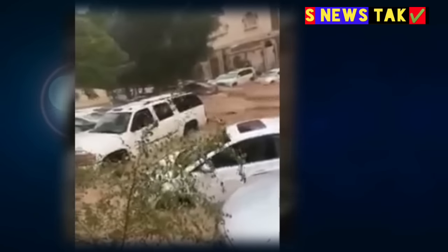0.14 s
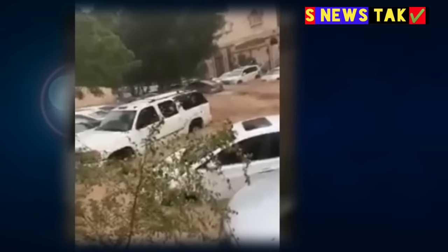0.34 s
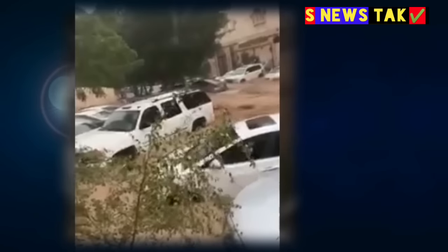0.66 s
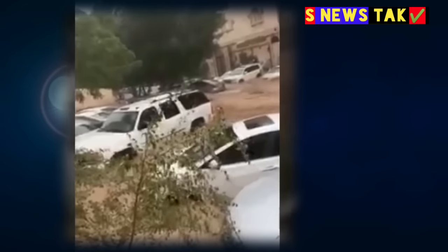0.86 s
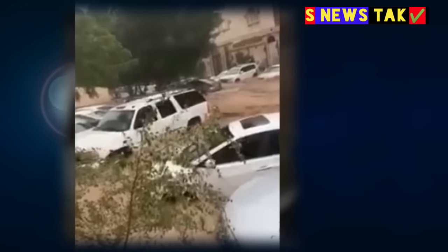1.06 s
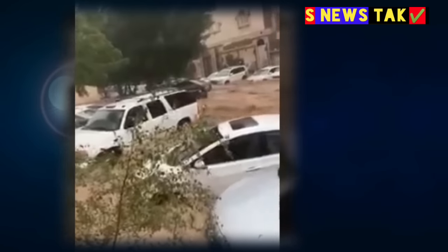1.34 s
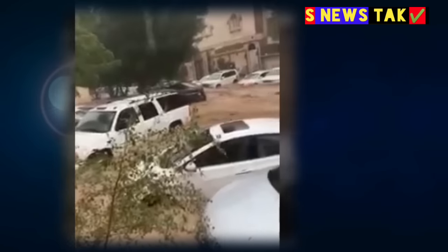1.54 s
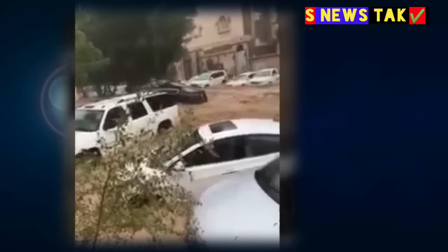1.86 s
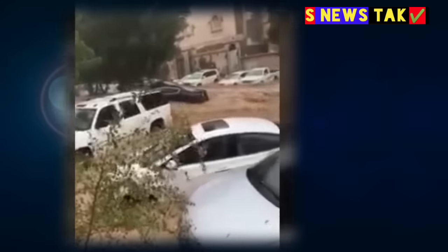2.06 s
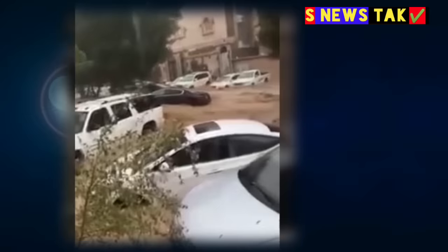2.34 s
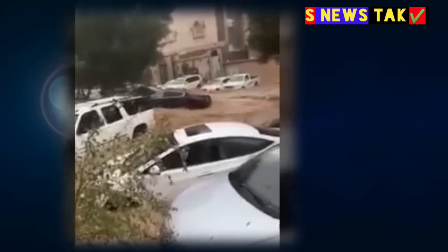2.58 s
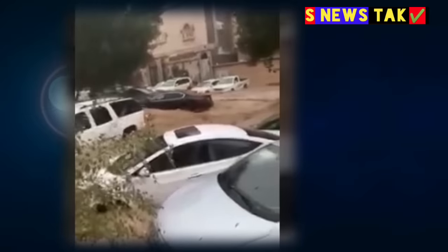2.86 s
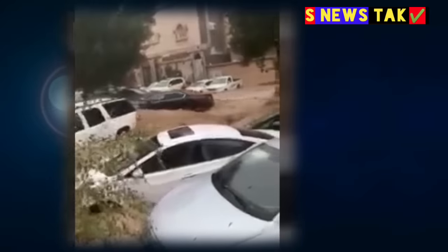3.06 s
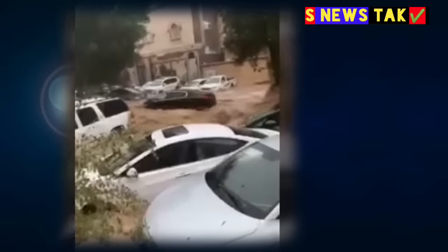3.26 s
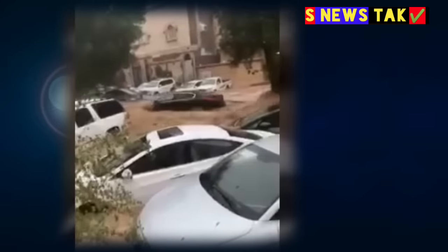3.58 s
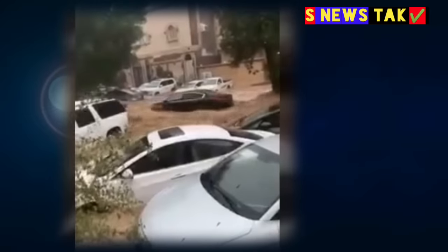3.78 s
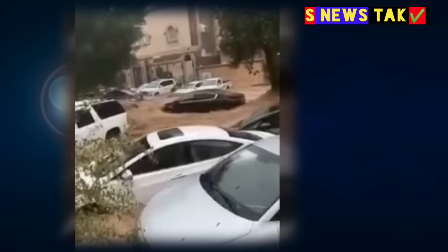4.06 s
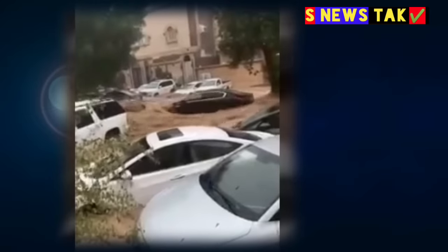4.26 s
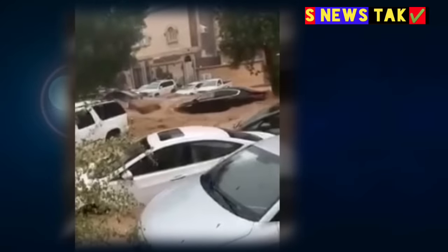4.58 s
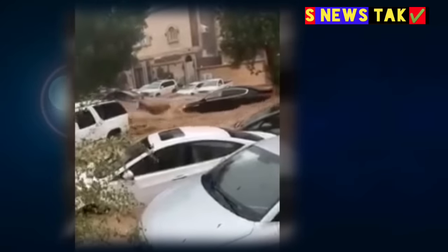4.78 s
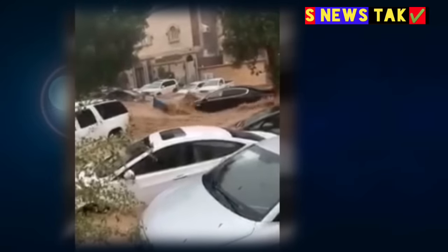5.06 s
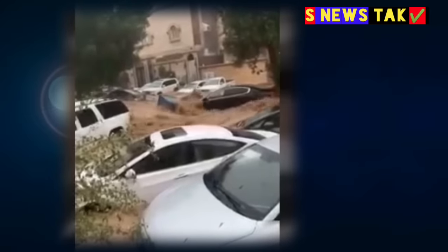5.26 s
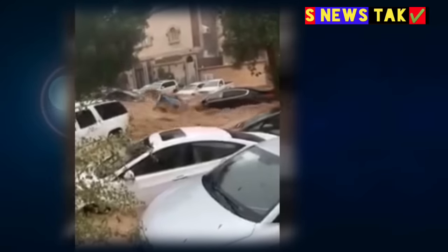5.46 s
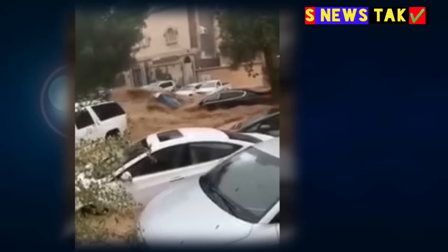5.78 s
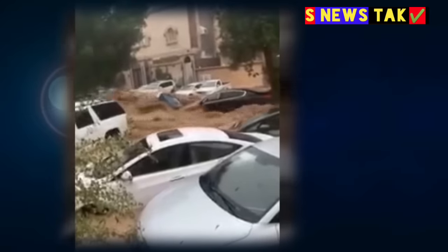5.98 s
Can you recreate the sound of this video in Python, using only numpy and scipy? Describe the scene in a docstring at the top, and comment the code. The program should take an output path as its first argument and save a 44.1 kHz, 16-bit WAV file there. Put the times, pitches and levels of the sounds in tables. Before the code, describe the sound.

Loud muddy floodwater runs throughout, an even dark roar centred in the low mids, thick with small gurgling bubbles, over a surging bass rumble and a very faint hiss of spray. The bass rises quickly at the start, eases around 0.7 s, and is fuller again from about 4 s until it drops at the end. At 0.2 s a firm knock on sheet metal ticks, then slides down into a low boom; softer bumps follow at 0.6 and 1.0 s. Around 1.9 s comes a tight cluster of higher, hollow clunks, then a low knock at 2.6 s. An unsteady deep hum wavers from 1.9 to 3.2 s, again at 4.1-4.6 and 5.3-5.7 s. At 5.0 s the hardest bang lands, with a short metallic crumple and boom, then light thuds at 5.2, 5.5 and 5.7 s. The sound is sheltered, slightly boxy, with dulled treble.

```python
"""Muddy floodwater races down a street past parked cars, heard from a sheltered spot.
Shaped noise makes the torrent: a surging bass, an even roar with gurgling bubbles, and a hiss of spray.
Drifting cars and debris knock on sheet metal as ticks, gliding thuds and slow booms,
once with a crunch of noise ringing the sheet's modes. A low hum of wavering sines comes and goes.
A hollow colours all but the knocks; the treble has a deep dip and a hard top."""
import sys
import numpy as np
from scipy import signal
from scipy.fft import rfft, irfft, next_fast_len
from scipy.io import wavfile
from scipy.ndimage import uniform_filter1d, map_coordinates

SR = 44100
rng = np.random.default_rng(int(sys.argv[2]) if len(sys.argv) > 2 else 0)


def wav_out(sig):
    """Save sig, one row per channel (or a flat mono array), as 16-bit PCM at SR to the path in sys.argv[1]."""
    wavfile.write(sys.argv[1], SR, np.round(np.clip(np.atleast_2d(sig).T, -1, 1) * 32767).astype(np.int16))


N = 270333


def amp(db):
    """Decibels to gain."""
    return 10 ** (np.asarray(db) / 20)


def unit(x):
    """x at rms 1."""
    return x / np.sqrt(np.mean(x ** 2) + 1e-20)


def along(points, hz):
    """(Hz, value) points read on a log axis; the end values hold beyond the ends."""
    point_hz, value = np.transpose(points)
    return np.interp(np.log(hz + 1), np.log(point_hz + 1), value)


def curves(rows):
    """One value per sample for each column after the time."""
    time_s, *columns = np.transpose(rows)
    return [np.interp(np.arange(N) / SR, time_s, column) for column in columns]


def wobble(rate):
    """A smooth random curve, rate knots a second."""
    knots = rng.standard_normal(int(N * rate / SR) + 4)
    return map_coordinates(knots, [np.arange(N) * rate / SR])


def filtered(x, response):
    """x times a complex response of frequency."""
    m = next_fast_len(N + SR // 2)
    return irfft(rfft(x, m) * response(np.fft.rfftfreq(m, 1 / SR)), m)[..., :N]


# course of the bass surge: time_s, level_db
SURGE_LEVEL = [(0, -48), (.13, -25.5), (.75, -31.5), (1.35, -27), (1.98, -25.5), (2.7, -27.5), (3.1, -29),
               (3.3, -28.5), (3.6, -27.5), (3.9, -29), (4.1, -25), (4.4, -23.5), (4.74, -25), (4.92, -24.5),
               (5.5, -24), (6.13, -31)]
# spectra of the surge, roar and spray, before each is set to rms 1: pitch_hz, level_db (per Hz)
SURGE_SPECTRUM = [(20, -50), (35, -4), (55, 8), (90, 9), (130, -0.5), (250, -59)]
ROAR_SPECTRUM = [(30, -41), (70, -9.5), (130, 1.5), (300, -4.5), (420, -5.5), (570, -7), (650, -13),
                 (780, -13.5), (1100, -16), (1600, -19.5), (2050, -25), (2450, -23.5), (2700, -25.5),
                 (4000, -40.5), (6000, -60)]
SPRAY_SPECTRUM = [(1500, -9.5), (3000, -0.5), (4800, -5), (5900, -3.5), (8000, -12), (12500, -7.5),
                  (14500, -17)]
ROAR_DB, SPRAY_DB = -21.5, -46  # middle levels, which wobble slightly


def torrent():
    """Bass surge, churning roar with gurgles, and fine spray."""
    (surge_db,) = curves(SURGE_LEVEL)
    swell_db = 0.83 * wobble(3.52)
    surge = amp(surge_db + .6 * wobble(4)) * rush(SURGE_SPECTRUM, patchy_db=.3)
    gurgles = bubbles(count=2500, middle_hz=759, cycles=7.1, spread_db=16.5)
    roar = rush(ROAR_SPECTRUM, patchy_db=0.77) + amp(-18.5) * gurgles
    spray = rush(SPRAY_SPECTRUM, patchy_db=.9) * amp(.4 * wobble(12))
    return surge + amp(ROAR_DB + swell_db) * roar + amp(SPRAY_DB) * spray


def rush(spectrum, patchy_db):
    """Coloured noise of rms 1 with patches of random gain: eddies that come and go."""
    z = signal.stft(rng.standard_normal(N), nperseg=512)[2]
    # smooth the random gains over neighbouring pitches, then over time
    field = uniform_filter1d(rng.standard_normal(z.shape), size=5, axis=0)
    field = uniform_filter1d(field, size=10, axis=1)
    noise = signal.istft(z * amp(patchy_db * unit(field)), nperseg=512)[1][:N]
    return unit(filtered(noise, lambda hz: amp(along(spectrum, hz))))


def bubbles(count, middle_hz, cycles, spread_db):
    """Trapped air rings for a few cycles while its pitch rises."""
    when, size, loud = rng.random((count, 3)).T
    pitch_hz = middle_hz * np.exp(1.593 * (size - .5))[:, None]
    t = np.arange(700) / SR
    turns = pitch_hz * t
    tone = np.sin(2 * np.pi * turns * (1 + 0.087 * turns / cycles))
    rings = tone * turns * np.exp(-3 * turns / cycles)
    rings = rings * amp(spread_db * loud)[:, None]
    # drop every ring at its own start and add them up
    at = (when * N).astype(int)[:, None] + np.arange(len(t))
    return unit(np.bincount(at.ravel(), rings.ravel(), N + len(t))[:N])


# knocks on a panel: start_s, thud_db, tick_db, boom_db, last_hz (pitch the thud settles on)
KNOCKS = [(.2277, -6.5, -7.5, -17, 116), (.572, -16, -30, -33, 100), (1.0235, -18, -9.5, -27, 90),
          (1.853, -7, -30, -35, 410), (1.8605, -5, -30, -35, 265), (1.877, -13, -30, -35, 200),
          (1.898, -12, -30, -33, 190), (2.6115, -10, -10.5, -20, 92), (4.964, 1.5, -30, -30, 200),
          (4.979, -11, -30, -35, 330), (4.989, -10, -22, -11.5, 115), (5.052, -7, -22, -30, 255),
          (5.234, -18, -11, -31, 100), (5.535, -9, -30, -30, 90), (5.683, -7, -25, -28, 110)]
GLIDE_CYCLES, RING_CYCLES = .9, 14  # glide time constant and 60 dB fade, in cycles of last_hz
SOFT_START = 1.2  # the softest thud starts at this multiple of last_hz
HARD_START_HZ, HARD_TICK_DB = 110, -3  # a tick this near the thud's level adds the full extra Hz


def knocks():
    """A tick, then bending waves: the high ones arrive first, so the thud glides down into a boom."""
    out, t = np.zeros(N + SR), np.arange(SR // 3) / SR
    tick = -np.sin(2 * np.pi * 800 * t) * np.exp(-t / .0009)
    # the whole body swells slowly, peaking after 22 ms
    boom_swell = (t / .022) ** 2 * np.exp(2 - t / .011)
    boom = -np.sin(2 * np.pi * 55 * t) * boom_swell
    for start_s, thud_db, tick_db, boom_db, last_hz in KNOCKS:
        hardness = min(amp(tick_db - thud_db - HARD_TICK_DB), 1)
        first_hz = SOFT_START * last_hz + hardness * HARD_START_HZ
        fading = np.exp(-t * last_hz / GLIDE_CYCLES)
        hz = last_hz + (first_hz - last_hz) * fading
        level = amp(thud_db - 60 * t * last_hz / RING_CYCLES) * (1 - fading)
        thud = np.sin(2 * np.pi * np.cumsum(hz) / SR) * level
        out[round(start_s * SR):][:len(t)] += thud + amp(tick_db) * tick + amp(boom_db) * boom
    return out[:N]


# the sheet buckles in ever weaker bursts after the big knock: peak_s, level_db
CRUNCH_BURSTS = [(4.985, -16.5), (5.008, -18.5), (5.054, -20.5), (5.092, -27)]
# modes of the crumpling sheet: centre_hz, width_hz, level_db (relative)
SHEET_MODES = [(125, 60, -3), (260, 60, -2), (350, 60, -1), (570, 110, -3), (830, 90, -7), (990, 90, -5),
               (1560, 110, -13), (1900, 140, -14), (2150, 120, -20), (2900, 500, -32)]
BUCKLE_RISE_S, BUCKLE_T60_S = .08, .3  # 60 dB rise and fall


def crunch():
    """Crumpling sheet metal: ragged noise rings the sheet's modes."""
    t = np.arange(N) / SR
    power = np.zeros(N)
    for peak_s, level_db in CRUNCH_BURSTS:
        away = np.maximum((peak_s - t) / BUCKLE_RISE_S, (t - peak_s) / BUCKLE_T60_S)
        power += amp(level_db - 60 * away) ** 2

    def sheet(hz):
        """Resonances summed with alternating sign."""
        total = 0
        for k, (centre, width, level_db) in enumerate(SHEET_MODES):
            damping = 1j * hz * width
            total = total + (-1) ** k * amp(level_db) * damping / (centre ** 2 - hz ** 2 + damping)
        return total

    buckling = amp(1.5 * wobble(150)) * rng.standard_normal(N)
    return np.sqrt(power) * unit(filtered(buckling, sheet))


# a wavering low hum, one list for each swell: time_s, pitch_hz, level_db (rms of the fundamental)
HUM_SWELLS = [
    [(1.9, 88.9, -28), (2.14, 93.4, -25.5), (2.2, 84.5, -29), (2.28, 80.3, -21.5), (2.4, 77.6, -30),
     (2.47, 77.2, -19.5), (2.55, 77.8, -17), (2.6, 76, -27), (2.64, 70, -15), (2.69, 72.1, -22),
     (2.76, 82.8, -23), (2.81, 76.2, -24), (2.86, 76.6, -26), (2.92, 76.1, -23), (2.99, 79.6, -26.5),
     (3.08, 86.8, -21), (3.17, 86.2, -22), (3.24, 86.4, -35)],
    [(4.05, 80.5, -21), (4.3, 72.54, -33), (4.37, 70.4, -20), (4.5, 91.7, -19), (4.62, 83.7, -37)],
    [(5.25, 63.2, -27), (5.4, 61.3, -30), (5.5, 58, -16), (5.6, 61.3, -17), (5.66, 57, -27)],
]


def hum():
    """A low unsteady tone with weak overtones, fading at both ends of each swell."""
    out, t = np.zeros(N), np.arange(N) / SR
    for rows in HUM_SWELLS:
        hz, level_db = curves(rows)
        phase = 2 * np.pi * np.cumsum(hz) / SR + 0.35 * wobble(14)
        fade = np.clip(np.minimum(t - rows[0][0], rows[-1][0] - t) / 0.034, 0, 1)
        tone = np.sin(phase) + amp(-13) * np.sin(2 * phase) + amp(-20) * np.sin(3 * phase)
        out += np.sqrt(2) * amp(level_db + 1.4 * wobble(16)) * fade * tone
    return out


NOTCH_HZ, NOTCH_WIDTH_HZ = 1314.6, 92
BUMP_HZ, BUMP_WIDTH_HZ = 1451, 308
BUMP_DRIFT_HZ = 45  # the two blended bumps sit this far below and above BUMP_HZ


def sheltered(x):
    """A hollow between street and listener: a notch, and above it a bump blended between two pitches."""
    def mode(hz, centre, width):
        """Response of a damped mode, to be used above or below the line."""
        return centre ** 2 - hz ** 2 + 1j * hz * width

    def hollow(bump_hz):
        """x through the notch and a bump at bump_hz."""
        return filtered(x, lambda hz: mode(hz, NOTCH_HZ, NOTCH_WIDTH_HZ) / mode(hz, bump_hz, BUMP_WIDTH_HZ))

    low, high = hollow(BUMP_HZ - BUMP_DRIFT_HZ), hollow(BUMP_HZ + BUMP_DRIFT_HZ)
    share = .5 + .5 * np.tanh(wobble(4))
    return share * high + (1 - share) * low


def scene():
    """Street sounds pass the hollow; knocks come uncoloured through the solid ground and walls."""
    street = torrent() + crunch() + hum()
    return (sheltered(street) + knocks())[None]


# tone of the whole mix, with one wide dip in the treble: pitch_hz, level_db
TREBLE = [(7800, 1), (8500, -7.5), (9300, -28), (10500, -35), (11300, -15), (12200, -6.5), (13900, -2.5),
          (14400, -11.5)]
TOP_HZ = 14680  # nothing from here up


def record(dry):
    """The treble has a deep dip and a hard limit."""
    return filtered(dry, lambda hz: amp(along(TREBLE, hz)) * (hz < TOP_HZ))


dry = scene()
out = record(dry)
wav_out(out)
```